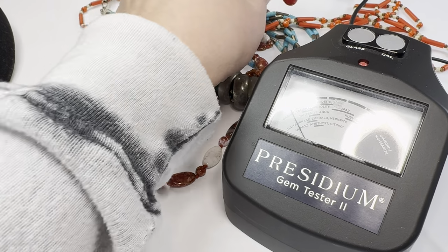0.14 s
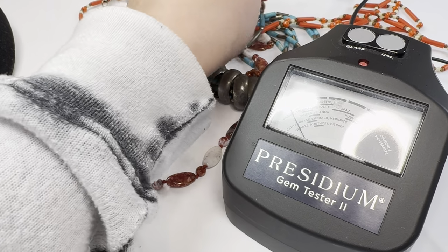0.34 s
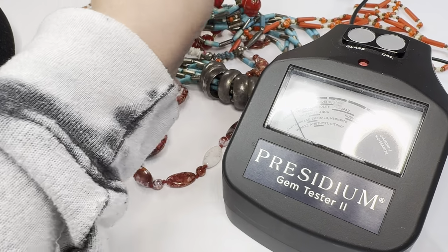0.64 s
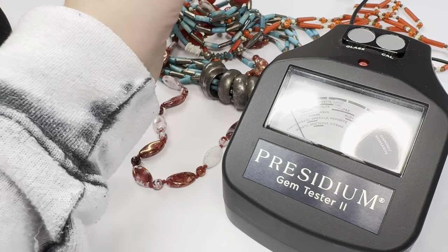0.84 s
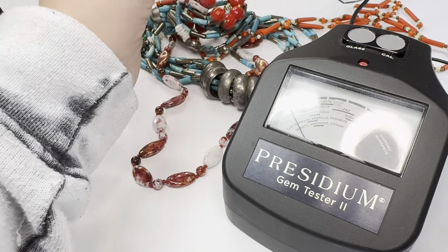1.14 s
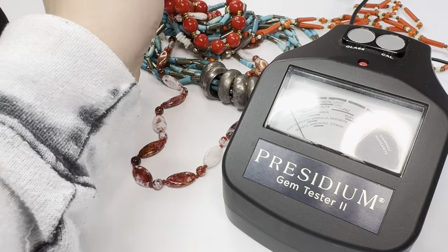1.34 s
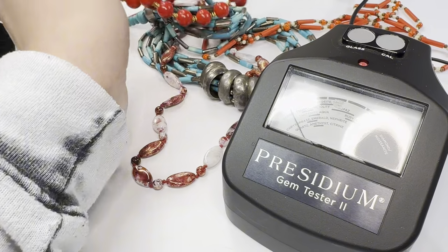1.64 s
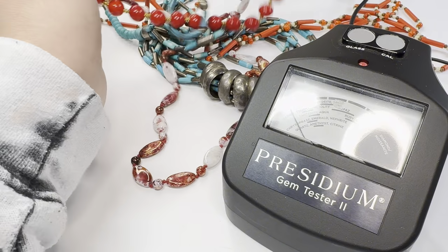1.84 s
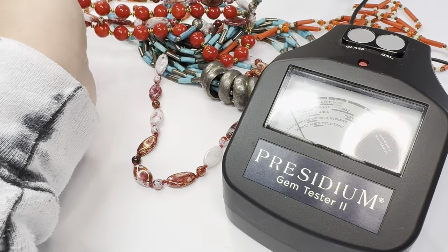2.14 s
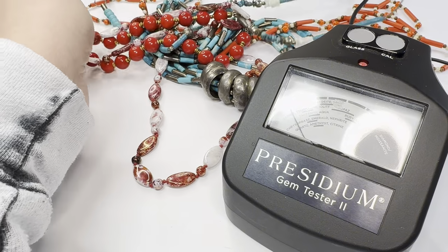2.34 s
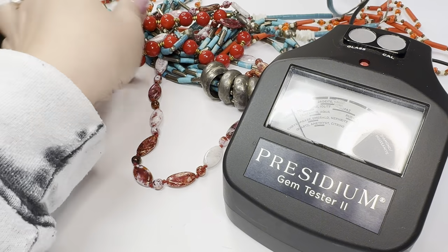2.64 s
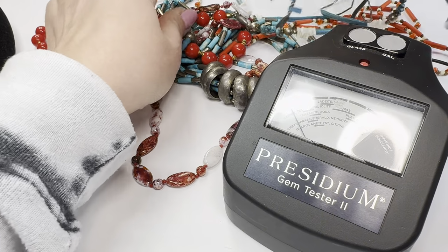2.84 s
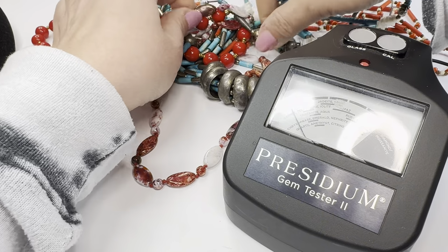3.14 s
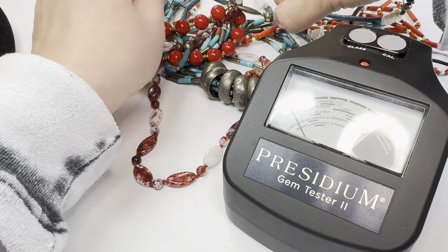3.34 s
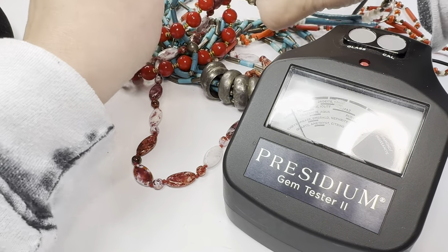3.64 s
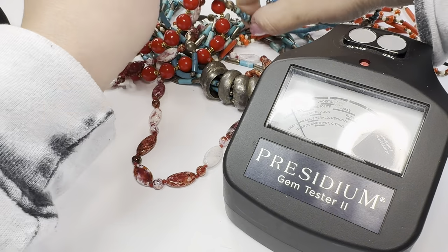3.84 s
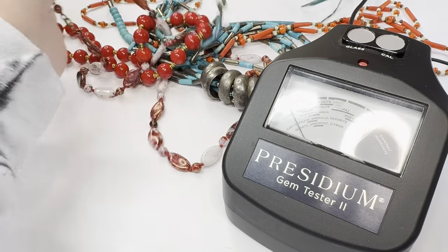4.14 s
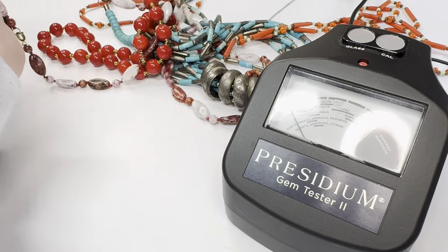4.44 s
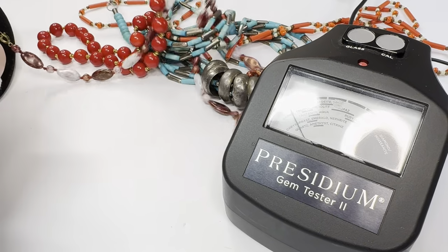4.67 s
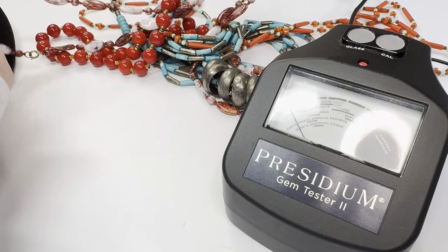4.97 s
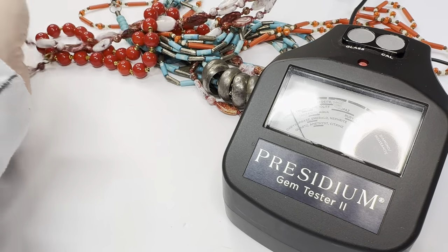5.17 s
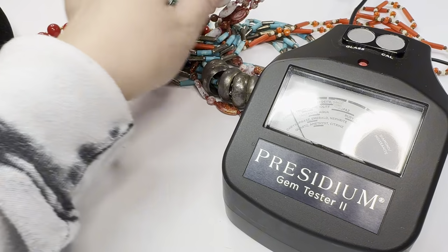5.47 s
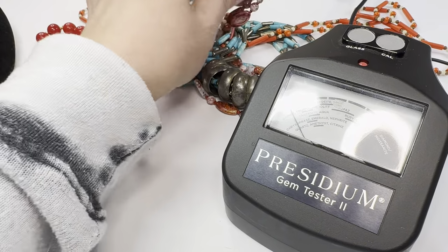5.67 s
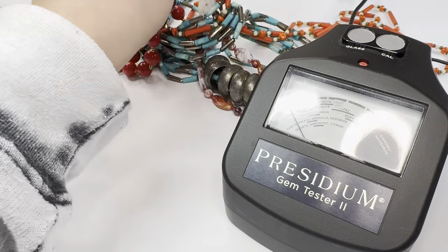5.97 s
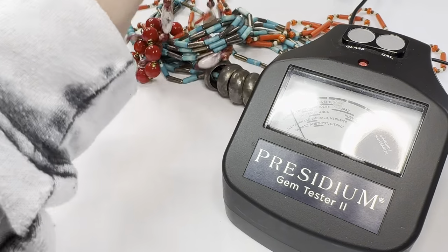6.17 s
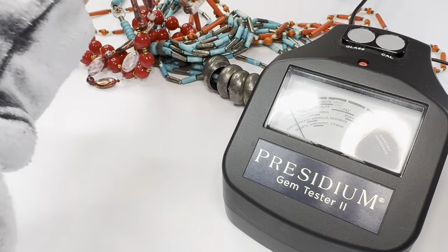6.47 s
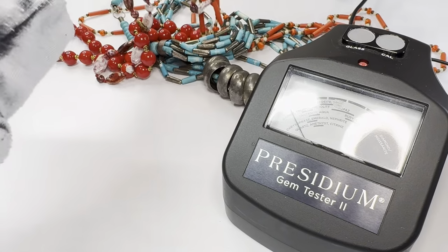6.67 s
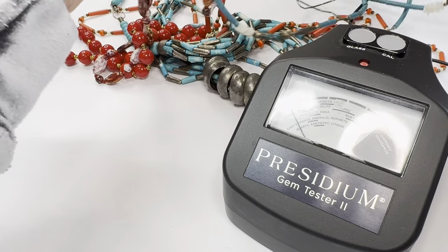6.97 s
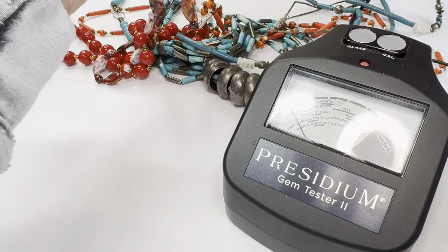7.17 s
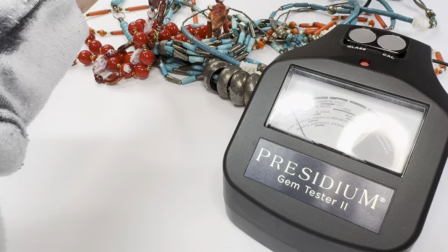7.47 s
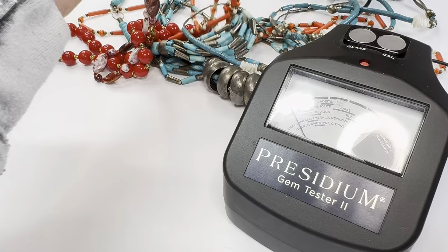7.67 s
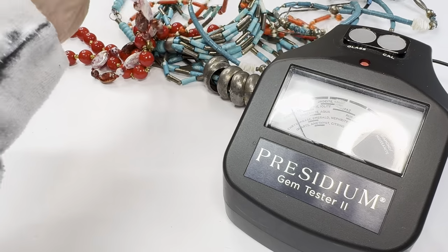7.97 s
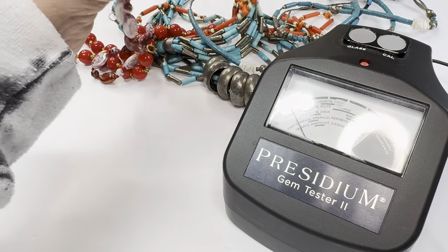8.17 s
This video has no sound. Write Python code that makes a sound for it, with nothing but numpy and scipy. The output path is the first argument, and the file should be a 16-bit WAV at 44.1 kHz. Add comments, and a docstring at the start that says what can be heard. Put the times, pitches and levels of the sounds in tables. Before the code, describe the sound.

Small hard beads click and rattle as a hand pulls strands from a heap, while larger beads clack dry on the tabletop. Gentle pulls lead to a loud crack, softer shifting, then a dense rattling stretch with dull thumps. After a short lull, bursts of handling resume until the end. Close and crisp, leaning slightly right, with a short room tail and faint hum.

```python
"""In a quiet room, bead necklaces are pulled out of a tangled heap on a table, close to two microphones.
Small beads tick and rattle: sharp touches, each with a short noisy jostle, through bright resonances.
Strands drag and larger beads clack on the tabletop at lower pitches; rubbing beads chirp on one resonance.
Bumps ring the table's low modes, and rolling beads and the sleeve make it rumble.
Faint filtered noise and a wavering low hum lie underneath."""
import sys
import numpy as np
from scipy import signal
from scipy.fft import rfft, irfft, next_fast_len
from scipy.io import wavfile

SR = 44100
rng = np.random.default_rng(int(sys.argv[2]) if len(sys.argv) > 2 else 0)


def unload_audio(sound):
    """Save the sound as a 16-bit wav file, at the path given as the first command line argument."""
    columns = np.transpose(np.atleast_2d(sound))
    # keep every value between -1 and 1, then stretch to whole-number steps
    steps = np.round(np.clip(columns, -1, 1) * 32767)
    wavfile.write(sys.argv[1], SR, steps.astype(np.int16))


N = 366471
TIME = np.arange(N) / SR   # s

# Levels in these tables are relative, ahead of each layer's trim and the room.
# bead against bead: (time [s], level [dB], pitch of the bead [Hz])
TICKS = [(0.0224, -31, 11900), (0.111, -31, 11000), (0.1388, -23.5, 10550), (0.264, -30, 8300),
         (0.4237, -30, 11200), (0.478, -25.5, 12500), (0.702, -26, 13300), (0.983, -27, 8100),
         (1.2722, -29.5, 10200), (1.383, -26.5, 10800), (1.424, -29, 12000), (1.597, -24, 11000),
         (1.689, -30, 8300), (1.795, -20, 15500), (1.811, -18, 15300), (1.8466, -11, 11000),
         (1.8755, -13, 13700), (1.905, -20, 11300), (1.978, -29, 13000), (2.98, -32.5, 8300),
         (3.105, -31.5, 7960), (3.249, -31.5, 7500), (3.4233, -31.5, 11100), (3.6433, -24.5, 8080),
         (3.986, -24, 11100), (4.1024, -26, 11700), (4.15, -21, 11300), (4.352, -22.5, 11900),
         (4.5567, -19.5, 11600), (4.6645, -19, 15400), (4.721, -17.5, 13300), (4.7532, -12, 13300),
         (4.757, -12.5, 15300), (4.862, -24, 12500), (4.875, -18.5, 9900), (4.9134, -15.5, 9700),
         (4.94, -23.5, 11300), (4.997, -31, 10300), (5.125, -23, 11200), (5.5608, -25, 7600),
         (5.736, -36.5, 7800), (5.9233, -25.5, 7900), (6.0791, -18.5, 12900), (6.115, -13.5, 13000),
         (6.508, -27.5, 11200), (6.73, -22.5, 11250), (6.78, -27, 11000), (6.804, -31, 11300),
         (7.014, -29.5, 10300), (7.104, -17.5, 13700), (7.3612, -27.5, 10900), (7.464, -34, 15600),
         (7.486, -30.5, 10600), (7.5457, -17, 11530), (7.662, -20, 11100), (7.778, -22.5, 8600),
         (7.888, -22.5, 8260), (8.238, -31, 10700)]
# larger beads landing on the tabletop: (time [s], level [dB], pitch of the clack [Hz])
CLACKS = [(0.7118, -35.5, 1360), (0.7125, -33.5, 2750), (0.976, -37, 3000), (1.088, -42.5, 2950),
          (1.089, -36, 850), (1.615, -31.5, 1890), (1.7598, -21.5, 2200), (1.81, -28.5, 1840),
          (1.8756, -10, 3800), (1.877, -18, 754), (2.32, -36.5, 2550), (2.322, -36, 704),
          (2.3725, -21, 1590), (2.44, -16.5, 1820), (2.47, -25.5, 1800), (2.478, -26.5, 1280),
          (2.679, -32, 1950), (2.699, -26, 3600), (2.707, -22, 440), (2.751, -34, 1670),
          (2.879, -31.5, 1960), (3.341, -30, 2280), (3.372, -37, 2620), (3.667, -37, 2040),
          (3.709, -30, 2160), (3.919, -33.5, 2150), (4.072, -23.5, 1880), (4.229, -30, 1780),
          (4.344, -26, 1750), (4.503, -34, 1780), (4.734, -22, 1230), (4.845, -48, 1950),
          (4.862, -23, 1960), (5.166, -38, 2100), (5.186, -27, 880), (5.205, -22, 1600), (5.21, -31, 1840),
          (5.255, -34, 840), (6.024, -36, 1760), (6.083, -34, 2260), (6.67, -33.5, 590),
          (6.7135, -28, 1590), (6.728, -26, 2380), (6.73, -29.5, 710), (6.85, -42, 1960),
          (7.04, -31.5, 1900), (7.063, -31, 1470), (7.093, -20.5, 2190), (7.287, -25.5, 1880),
          (7.362, -32.5, 1730), (7.47, -40, 1820), (7.797, -25, 2100), (8.089, -35, 1700),
          (8.183, -38, 2680), (8.295, -31.5, 750)]
# the heap or a hand bumping the table: (time [s], level [dB], hardness: knock against boom [dB])
THUDS = [(0.984, -30.5, -8.5), (1.286, -37.5, -9.5), (1.879, -28.5, -2.5), (2.303, -34.5, -15),
         (2.414, -31, -17), (2.467, -40, 9.5), (2.53, -31.5, -9), (2.562, -29, -8.5), (2.706, -24.5, -7),
         (3.035, -35, -6.5), (4.845, -38, 6), (4.863, -22, -13), (4.915, -31.5, -3), (4.941, -29, -3.5),
         (5.166, -32.5, 2), (5.178, -30, -14), (5.206, -36, 11), (6.013, -36, -0.5), (6.115, -30.5, -21),
         (6.513, -38, -12.5), (6.637, -37, -13), (6.731, -26.5, -2.5), (6.742, -30.5, -20),
         (7.06, -35.5, -6), (7.285, -31, 3.5), (7.886, -29.5, -7)]
# polished beads rubbing on each other: (time [s], length [s], level [dB], pitch [Hz])
RUBS = [(1.762, 0.022, -36, 2010), (2.634, 0.037, -41, 1560), (2.799, 0.02, -37.5, 2060),
        (3.147, 0.039, -51.5, 2110), (3.189, 0.027, -54, 2200), (3.668, 0.13, -50.5, 2170),
        (6.9, 0.051, -44.5, 1880)]
# the hand pulls or shifts a strand: (time of full grip [s], rise before it [s], length after it [s],
# swell over the pull [dB], bead rattle [dB], drag on the tabletop [dB], table shake [dB])
PULLS = [(0.486, 0.054, 0.014, 4.5, -44.5, -59, -56), (0.685, 0.03, 0.32, 9.5, -50.5, -58, -57.5),
         (1.036, 0.04, 0.26, -4.5, -53, -60, -59), (1.414, 0.032, 0.14, 8, -44, -47.5, -51.5),
         (1.573, 0.073, 0.33, 3, -38, -45.5, -46), (1.971, 0.026, 0.048, -10.5, -43, -64, -57),
         (2.175, 0.072, 0.05, 0.5, -44.5, -59.5, -58.5), (2.393, 0.055, 0.15, 2, -53, -42, -43.5),
         (2.678, 0.06, 0.044, 3, -47, -37, -34), (2.793, 0.029, 0.15, 2, -62, -52, -66),
         (3.012, 0.032, 0.56, -4, -53.5, -54, -55), (3.665, 0.043, 0.084, -3, -52, -45.5, -44.5),
         (3.858, 0.045, 0.32, -1.5, -41.5, -42, -46), (4.24, 0.027, 0.16, 1, -36, -38.5, -44.5),
         (4.535, 0.15, 0.23, 9, -38, -44.5, -45.5), (4.71, 0.0088, 0.011, 0, -52.5, -38, -43),
         (4.875, 0.035, 0.059, 0.5, -45, -43.5, -35.5), (5.127, 0.008, 0.037, -2.5, -33.5, -46.5, -42),
         (5.181, 0.018, 0.02, 1.5, -60, -36.5, -38.5), (5.25, 0.0077, 0.037, -9.5, -71, -41, -43.5),
         (5.588, 0.03, 0.051, -2, -52, -60, -60), (5.899, 0.13, 0.26, 4.5, -38.5, -41.5, -42),
         (6.32, 0.029, 0.073, -6.5, -40, -49.5, -50.5), (6.508, 0.0075, 0.011, -2.5, -38.5, -71, -65),
         (6.637, 0.039, 0.062, 2, -40.5, -50, -45.5), (6.827, 0.034, 0.15, -5, -68, -50, -51.5),
         (7.103, 0.0098, 0.077, -3.5, -48.5, -49, -51.5), (7.277, 0.023, 0.089, 6.5, -70, -48, -43.5),
         (7.659, 0.081, 0.21, 4.5, -38, -40, -45.5), (7.914, 0.071, 0.16, -10.5, -46, -45, -44)]
# how fast each dies away once the hand lets go: (rattle [dB/s], drag [dB/s], shake [dB/s])
SETTLE_DB_PER_S = (178, 199, 196.5)
# light fingering of the heap between pulls; the hand lifts clear once: (time [s], level [dB])
FINGERING = [(0.0, -56.5), (1.5, -60.5), (3.6, -63), (4.5, -51.5), (5.1, -58), (5.4, -93.5), (5.7, -80.5),
             (6.2, -46), (7.3, -63), (8.3, -54)]
# how fingering is shared out: (rattle [dB], drag [dB], shake [dB])
FINGERING_SHARE_DB = (0.5, -7, -4)
# low modes of the table: (frequency [Hz], level [dB], t60 [s])
TABLE_MODES = [(62, -9, 0.21), (94.2, -8.5, 0.12), (115, 0.5, 0.084), (122, -4.5, 0.11), (192, -9, 0.12),
               (210.5, -5, 0.087)]

# colour of small beads touching: (frequency [Hz], gain [dB])
BEAD_COLOUR = [(1200, -31), (3300, -13), (6100, -14.5), (6700, -7), (8500, -2.5), (11100, -1.5),
               (12500, -2.5), (13100, 3), (13700, -3.5), (15000, 0.5), (15600, 1.5), (15950, -21.5)]
# colour of strands on the tabletop: (frequency [Hz], gain [dB])
DRAG_COLOUR = [(200, -18), (450, -2), (850, 1.5), (1200, -1.5), (1550, 2), (2100, 0.5), (2650, -5.5),
               (3200, -4), (4200, -8.5), (6000, -14), (9000, -21.5)]
# colour of a large bead hitting the tabletop: (frequency [Hz], gain [dB])
CLACK_COLOUR = [(200, -19), (450, -2), (720, 0.5), (1150, 0.5), (1500, 0), (2000, -0.5), (2600, -4),
                (3600, -3), (4500, -10), (5800, -17), (8000, -5.5), (11000, -16.5)]
# colour of the knock in a bump: (frequency [Hz], gain [dB])
KNOCK_COLOUR = [(150, -23.5), (300, -6.5), (420, 1), (560, -15.5), (720, -9), (1000, -14), (1400, -7),
                (3000, -30.5)]
# colour of the shaken table: (frequency [Hz], gain [dB])
RUMBLE_COLOUR = [(35, -46.5), (70, -10.5), (120, 1.5), (160, -5), (225, -6), (290, -15), (410, -6),
                 (600, -22), (1200, -33)]
# colour of the room tone: (frequency [Hz], gain [dB])
ROOM_TONE_COLOUR = [(30, -21.5), (52, -4), (80, -12), (104, -13), (121, -2.5), (180, -10), (300, -17),
                    (600, -34), (2000, -37), (5000, -45), (12000, -55.5), (16000, -37)]

# phase between the two microphone ports: (frequency [Hz], lead of the left [rad])
PORT_PHASE = [(130, 0.24), (500, 0.6), (850, 0.58), (1100, -2), (1450, -4.5), (2100, -4.5), (3000, -5.5),
              (4000, -4.5), (7700, -6), (8500, -6), (9500, -3.5), (11400, -0.97), (12900, 1), (14200, 10),
              (15700, -24.5)]
# level between the two microphone ports: (frequency [Hz], left minus right [dB])
PORT_BALANCE = [(50, -1.5), (500, -4), (1300, -3), (2700, -4.5), (5000, -4.5), (8000, -0.5), (12000, 0)]
# early echoes from the nearest walls: (delay [s], level [dB])
ECHOES = [(0.0094, -9.5), (0.0209, -20)]

GRIP_DB = 18   # climb in level during the rise of a pull
RUB_POLE_WIDTH_HZ, RUB_WAVER = 470, 0.05   # waver is a fraction of the pitch
HUM_HZ, HUM_DB = 59, -59.5   # centre of the wavering pitch and level
HEAP_LEAD_S = 7e-6   # arrival gap between the ports for either end of the heap
ROOM_T60_S, ROOM_TREBLE_T60_S, ECHO_SMEAR_S = 0.24, 0.057, 0.00081
CUTOFF_HZ = 16300


def from_db(db):
    """Decibels to gain."""
    return 10 ** (np.asarray(db) / 20)


def rms_one(x):
    """Scale to an rms of 1."""
    return x / np.sqrt(np.mean(x ** 2) + 1e-20)


def peak_one(x):
    """Scale to a peak of 1."""
    return x / (np.abs(x).max() + 1e-20)


def at_hz(points, hz):
    """Read a curve on a log-frequency axis."""
    f, value = np.transpose(points)
    return np.interp(np.log(np.maximum(hz, 1)), np.log(f), value)


def add(track, s, sound):
    """Mix a sound into the track from time s."""
    start = int(np.clip(round(s * SR), 0, N - 1))
    track[start:start + len(sound)] += sound[:N - start]


def response(colour, size=4096):
    """Causal (minimum-phase) impulse response with this colour, by folding the cepstrum."""
    gain = from_db(at_hz(colour, np.fft.rfftfreq(size, 1 / SR)))
    cepstrum = irfft(np.log(gain))
    cepstrum[1:size // 2] *= 2
    cepstrum[size // 2 + 1:] = 0
    return irfft(np.exp(rfft(cepstrum)))[:size // 2]


def through(x, impulse):
    """Pass a signal through an impulse response."""
    return signal.fftconvolve(x, impulse)[:len(x)]


def resonate(x, hz, width_hz):
    """One resonance, gain about 1 on top."""
    r = np.exp(-np.pi * width_hz / SR)
    feed = np.array([1, 0, -1]) * (1 - r * r) / 2
    back = [1, -2 * r * np.cos(2 * np.pi * hz / SR), r * r]
    return signal.lfilter(feed, back, x + 1e-18)


def drift(per_s):
    """Slow random wander: straight lines between per_s knots a second, which have a spread of 1."""
    knots = rng.standard_normal(4000)
    return np.interp(TIME * per_s, np.arange(len(knots)), knots)


def contact(t60, jostle_db, size=3072):
    """One sharp touch, then the neighbours on the string jostle and die away."""
    tail = rng.standard_normal(size) * from_db(-60 * np.arange(size) / SR / t60)
    tail *= from_db(jostle_db) / np.linalg.norm(tail)
    tail[0] = 1
    return tail


def collisions(per_s, spread_db, t60, jostle_db):
    """Random touches of uneven strength, each with a short jostle; power stays even at any rate."""
    born = rng.random(N) < per_s / SR
    strength = from_db(spread_db * np.minimum(rng.exponential(1, N), 3))
    clicks = born * strength * rng.choice([-1, 1], N) / np.sqrt(per_s)
    keep = from_db(-120 / (t60 * SR))   # the power, not the amplitude, decays by this each sample
    power = signal.lfilter([1 - keep], [1, -keep], clicks ** 2 + 1e-18)
    return clicks + from_db(jostle_db) * np.sqrt(power) * rng.standard_normal(N)


def background():
    """Faint room tone, partly shared by both sides, with a hum that wavers in phase and level."""
    tone = response(ROOM_TONE_COLOUR)
    shared, left, right = (rms_one(through(rng.standard_normal(N), tone)) for _ in range(3))
    hum_wave = np.sqrt(2) * np.sin(2 * np.pi * HUM_HZ * TIME + 0.6 * drift(6))
    hum = hum_wave * from_db(HUM_DB + 2.8 * drift(3.6))
    return from_db(-61.5) * shared + from_db(-67.0) * np.array([left, right]) + hum


def handling():
    """Levels of rattle, drag and shake in dB: each pull takes hold, swells or fades, then settles."""
    fingering_db = np.interp(TIME, *np.transpose(FINGERING))
    power = from_db(fingering_db + np.array(FINGERING_SHARE_DB)[:, None]) ** 2
    settle = np.array(SETTLE_DB_PER_S)[:, None]
    for s, rise, length, swell_db, *levels_db in PULLS:
        near = slice(max(int((s - .5) * SR), 0), int((s + length + .5) * SR))
        t = TIME[near] - s
        grip_db = GRIP_DB * np.minimum(t / rise, 0)
        effort_db = grip_db + swell_db * (np.clip(t / length, 0, 1) - .5)
        settle_db = settle * np.maximum(t - length, 0)
        power[:, near] += from_db(np.array(levels_db)[:, None] + effort_db - settle_db) ** 2
    return 10 * np.log10(power)


def rattle(level_db):
    """Small beads of four sizes click together in clumps, more often the harder the handling."""
    per_s = 29 * from_db(.55 * (level_db + 51.0) + 5 * drift(40))   # for each size
    grains = 0
    for hz in np.geomspace(8000, 14000, 4):
        touches = collisions(per_s, spread_db=4.7, t60=.008, jostle_db=2.0)
        grains = grains + touches + from_db(4.5) * resonate(touches, hz, width_hz=1200)
    soft_top = signal.butter(3, 14600, fs=SR, output="sos")   # light touches lack the very top
    grains = signal.sosfilt(soft_top, through(grains, response(BEAD_COLOUR)))
    return from_db(level_db - 5.5) * rms_one(grains * from_db(3.3 * drift(64)))


def drag(level_db):
    """Strands skip over the tabletop; each size of bead has its own pitch, and each wavers in level."""
    per_s = 24 * from_db(.65 * (level_db + 52.5))   # for each size
    grains = 0
    for hz in np.geomspace(700, 2900, 10):
        touches = collisions(per_s, spread_db=3.8, t60=.012, jostle_db=3.0)
        touches = touches * from_db(1.8 * drift(15))
        grains = grains + touches + from_db(11) * resonate(touches, hz, width_hz=.25 * hz)
    coloured = through(grains, response(DRAG_COLOUR))
    return from_db(level_db - 4.0) * rms_one(coloured * from_db(2.0 * drift(35)))


def rumble(level_db):
    """The rolling beads and the sleeve shake the table: dense touches with a low colour."""
    touches = collisions(500, spread_db=4.5, t60=0.015, jostle_db=4.5)
    return from_db(level_db - 2.0) * rms_one(through(touches, response(RUMBLE_COLOUR)))


def ticks():
    """Hard beads meet in a bright tick coloured by their size."""
    out, bright = np.zeros(N), response(BEAD_COLOUR)
    for s, level_db, hz in TICKS:
        touch = through(contact(t60=.013, jostle_db=4.5), bright)
        ring = from_db(6.5) * resonate(touch, hz, width_hz=520)
        add(out, s, from_db(level_db + 3.5) * peak_one(touch + ring))
    return out


def clacks(landings):
    """A large bead lands on the tabletop with a dry crack; its size sets a brief resonance."""
    out, top = np.zeros(N), response(CLACK_COLOUR)
    for s, level_db, hz in landings:
        crack = through(contact(t60=.018, jostle_db=5.0), top)
        ring = from_db(13) * resonate(crack, hz, width_hz=.26 * hz)
        add(out, s, from_db(level_db + 6.0) * peak_one(crack + ring))
    return out


def thuds(size=12000):
    """Each bump rings the table's low modes with strengths of its own; hard bumps knock louder."""
    out, t, knock_colour = np.zeros(N), np.arange(size) / SR, response(KNOCK_COLOUR)
    hz, mode_db, t60 = np.transpose(TABLE_MODES)[:, :, None]
    modes = np.sin(2 * np.pi * hz * t) * from_db(mode_db - 60 * t / t60)
    onset = 1 - np.exp(-(t / 0.0079) ** 2)
    for s, level_db, hard_db in THUDS:
        boom = from_db(2 * rng.standard_normal(len(modes))) @ modes * onset
        knock = through(contact(t60=0.056, jostle_db=5.0), knock_colour)
        add(out, s, from_db(level_db) * peak_one(boom))
        add(out, s, from_db(level_db + hard_db + 10.0) * peak_one(knock))
    return out


def rubs():
    """Quick stick-slip between two beads drives a narrow resonance, wavering as they roll: a chirp."""
    out = np.zeros(N)
    slips = collisions(700, spread_db=-7.0, t60=0.02, jostle_db=-6.5)
    waver = drift(60)
    keep = np.exp(-np.pi * RUB_POLE_WIDTH_HZ / SR)
    for s, length, level_db, hz in RUBS:
        stroke = slice(int(s * SR), int((s + length) * SR))
        pitch_hz = hz * (1 + RUB_WAVER * waver[stroke])
        turn = np.exp(2j * np.pi * np.cumsum(pitch_hz) / SR)
        # shift the moving pitch to zero, smooth there with a double pole, shift back
        smooth = signal.lfilter([1], [1, -2 * keep, keep * keep], slips[stroke] / turn)
        chirp = (smooth * turn).real
        add(out, s, from_db(level_db) * rms_one(chirp * signal.windows.tukey(len(chirp), .5)))
    return out


def ports(x, lead_s):
    """Direct sound reaches the two microphone ports with a phase gap set by pitch and direction."""
    size = next_fast_len(N + 4096)
    hz = np.fft.rfftfreq(size, 1 / SR)
    half = np.exp(.5j * (at_hz(PORT_PHASE, hz) + 2 * np.pi * hz * lead_s))
    return irfft(rfft(x, size) * np.array([half, 1 / half]), size)[:, :N]


def room(x, t60, wet_db, alike, lead_s=0, size=20000):
    """Direct sound, early echoes and a diffuse noise tail; alike is the share common to both sides."""
    t = np.arange(size) / SR
    shared = np.sqrt(alike) * rng.standard_normal(size)
    tails = shared + np.sqrt(1 - alike) * rng.standard_normal((2, size))
    decay = from_db(-60 * t / t60) * (1 - np.exp(-(t / 0.00058) ** 2))
    power = from_db(wet_db) ** 2 * decay ** 2 / np.sum(decay ** 2)
    for delay, echo_db in ECHOES:
        smear = np.exp(-((t - delay) / ECHO_SMEAR_S) ** 2)
        power = power + from_db(echo_db) ** 2 * smear / smear.sum()
    wet = np.array([through(x, tail * np.sqrt(power)) for tail in tails])
    return ports(x, lead_s) + wet


def off_centre(pair):
    """The heap lies nearer the right microphone, so the balance leans that way at most pitches."""
    size = next_fast_len(N + 4096)
    lean_db = at_hz(PORT_BALANCE, np.fft.rfftfreq(size, 1 / SR)) / 2
    return irfft(rfft(pair, size) * from_db([lean_db, -lean_db]), size)[:, :N]


def scene():
    """Beads rattle at both ends of the heap; three spots of the tabletop each have their own room tail."""
    rattle_db, drag_db, rumble_db = handling()
    beads = room(ticks(), ROOM_TREBLE_T60_S, wet_db=-6.5, alike=0)
    for lead_s in (-HEAP_LEAD_S, HEAP_LEAD_S):
        beads = beads + room(rattle(rattle_db), ROOM_TREBLE_T60_S, wet_db=-3.5, alike=0, lead_s=lead_s)
    spots = [clacks(CLACKS[k::3]) for k in range(3)]
    struck = sum(room(sound, ROOM_T60_S, wet_db=-7.5, alike=0) for sound in spots + [rubs()])
    sliding = room(drag(drag_db), ROOM_T60_S, wet_db=-0.5, alike=0)
    # long waves reach both microphones more alike
    table = room(rumble(rumble_db) + thuds(), ROOM_T60_S, wet_db=-12.0, alike=0.92)
    return off_centre(beads + struck + sliding + table + background())


def record(dry):
    """A steep elliptic low-pass cuts the top."""
    return signal.sosfilt(signal.ellip(10, .2, 70, CUTOFF_HZ, fs=SR, output="sos"), dry)


dry = scene()
out = record(dry)
unload_audio(out)
```